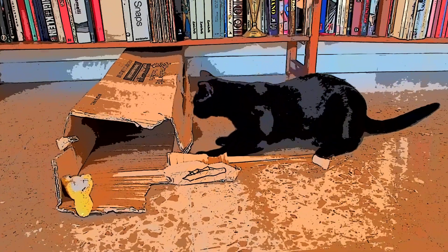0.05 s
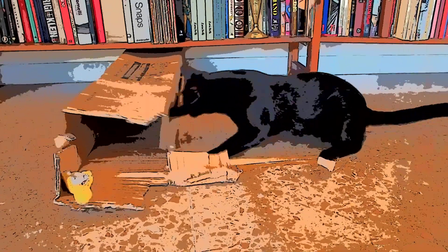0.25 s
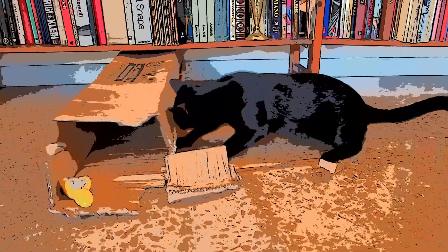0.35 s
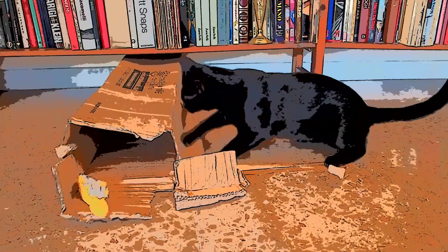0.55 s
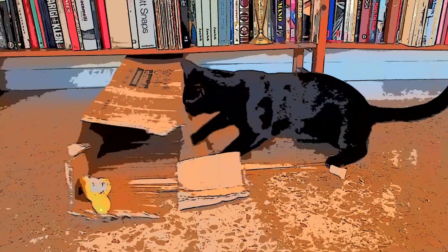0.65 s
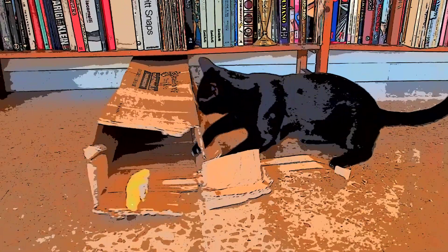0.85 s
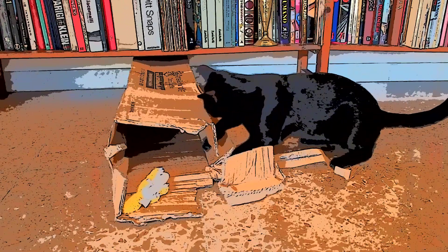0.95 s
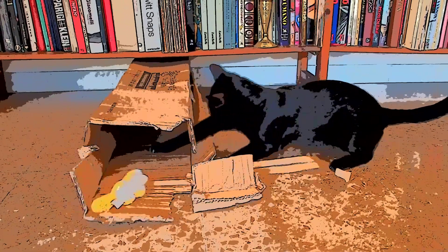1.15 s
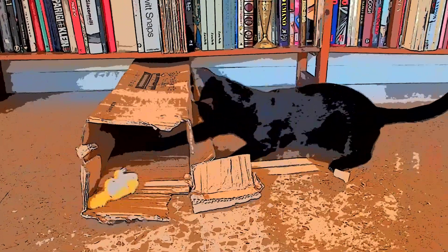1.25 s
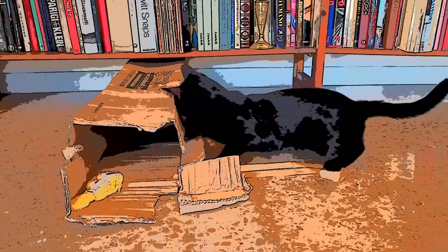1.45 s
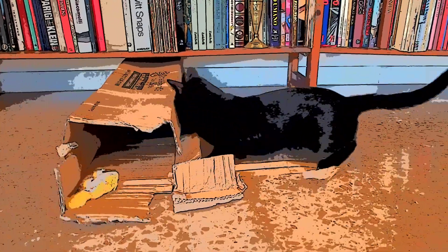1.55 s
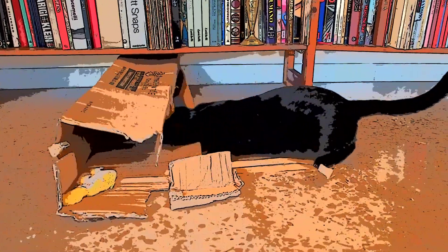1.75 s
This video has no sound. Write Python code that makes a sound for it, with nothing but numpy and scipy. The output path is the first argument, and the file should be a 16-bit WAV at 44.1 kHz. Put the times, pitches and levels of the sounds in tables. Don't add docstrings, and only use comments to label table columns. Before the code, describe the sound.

Cardboard box pushed by a cat: sharp snapping burst, hollow thumps, scraping, then a flap slap

```python
import sys
import numpy as np
from scipy import signal
from scipy.fft import rfft, irfft, next_fast_len
from scipy.io import wavfile
from scipy.ndimage import uniform_filter1d, map_coordinates

SR = 44100
rng = np.random.default_rng(int(sys.argv[2]) if len(sys.argv) > 2 else 0)


def ratio(d):
    e = np.asarray(d, float) / 20
    return 10 ** e


def store_wav(level_fs):
    pcm = np.round(np.clip(np.atleast_2d(level_fs), -1, 1) * 32767)
    wavfile.write(sys.argv[1], SR, pcm.T.astype(np.int16))


N = 79380


def unit(x):
    return x / np.sqrt(np.mean(x ** 2) + 1e-20)


def along(points, hz):
    f, v = np.transpose(points)
    return np.interp(np.log(hz + 1), np.log(f + 1), v)


def curves(rows):
    s, *cols = np.transpose(rows)
    t = np.arange(N) / SR
    return [np.interp(t, s, c, left=-120 * (k == 0)) for k, c in enumerate(cols)]


def wobble(rate_hz):
    knots = rng.standard_normal(int(N * rate_hz / SR) + 4)
    return map_coordinates(knots, [np.arange(N) * rate_hz / SR])


def filtered(x, response):
    m = next_fast_len(N + SR // 2)
    return irfft(rfft(x, m) * response(np.fft.rfftfreq(m, 1 / SR)), m)[..., :N]


def peak(f, hz, width_hz):
    return 1j * f * width_hz / (hz * hz - f * f + 1j * f * width_hz)


def resonances(table):
    return lambda f: sum((-1) ** k * ratio(db) * peak(f, hz, w) for k, (hz, w, db) in enumerate(table))


# f/Hz, correlation/0-1
LIKENESS = [(60, 1), (180, 0.83), (550, 0.55), (1650, 0.62), (4970, 0.27), (15000, 0.12)]


def spread(pair, spectrum):
    def response(hz):
        turn = np.arccos(np.clip(along(LIKENESS, hz), -1, 1)) / 2
        return ratio(along(spectrum, hz)) * [np.cos(turn), np.sin(turn)]

    mid, side = filtered(pair, response)
    return unit(np.array([mid + side, mid - side]))


def patchy(patchy_db):
    z = signal.stft(rng.standard_normal((2, N)), nperseg=256)[2]
    field = uniform_filter1d(rng.standard_normal(z.shape[1:]), 8, 0)
    field = uniform_filter1d(field, 9, 1)
    return signal.istft(z * ratio(patchy_db * unit(field)), nperseg=256)[1][:, :N]


def add(out, s, x):
    out[round(s * SR):][:len(x)] += x


# f/Hz, level/dB per Hz
AIR_SPECTRUM = [(28, -7.5), (90, 3.5), (352, -13.5), (392, -11), (447, -10), (855, -15.5), (1670, -23),
                (3270, -25), (15900, -34)]


def air():
    air_db, hum_hz, hum_db = -45.5, 49, -36
    duck_db, duck_at_s = -8, 0.24
    t = np.arange(N) / SR
    gain_db = duck_db / (1 + np.exp((duck_at_s - t) / 0.019)) - 12 * np.exp(-t / 0.075)
    phase = 2 * np.pi * np.cumsum(hum_hz + 8.0 * wobble(9.2)) / SR
    hum = np.sin(phase) * ratio(gain_db + 1.3 * wobble(10.8))
    return ratio(air_db) * spread(patchy(patchy_db=-0.1), AIR_SPECTRUM) + ratio(hum_db) * hum


# t/s, rubbing level/dB, brightness/dB
SLIDE_CURVE = [(0.19, -35.5, 1.5), (0.26, -30.5, 3), (0.31, -33.5, 11.5), (0.42, -37, 2), (0.495, -36, 1.5),
               (0.535, -37.5, 1), (0.66, -42.5, -1), (0.72, -35.5, 2.3), (0.86, -37.5, -0.1),
               (0.99, -37.5, -0.8), (1.04, -42, -2), (1.11, -35, 0.5), (1.26, -42.5, 0.1), (1.33, -36.5, 0),
               (1.42, -44, 1), (1.6, -45.5, 2.8), (1.68, -43, 0), (1.8, -41.5, 0)]
# f/Hz, level/dB per Hz
RUB_SPECTRUM = [(400, -56), (800, -4.5), (1400, -5), (2500, -7.5), (5500, -3.5), (9300, -9.5),
                (13000, -13.5), (15900, -19.5)]


def scrape():
    grains_per_s, grain_spread_db, grain_top, grain_db = 1400, 3, 1.4, -1.5
    level_db, tilt_db = curves(SLIDE_CURVE)
    size_db = grain_spread_db * np.minimum(rng.exponential(size=N), grain_top)
    slips = (rng.random(N) < grains_per_s / SR) * ratio(size_db)
    grains = np.sqrt(np.abs(uniform_filter1d(slips ** 2, size=24))) * rng.standard_normal((2, N))
    rub = spread(patchy(patchy_db=3.5) + ratio(grain_db) * unit(grains), RUB_SPECTRUM)
    high = filtered(rub, lambda f: 1 / (1 + (6500 / (f + 1)) ** 4))
    tilted = ratio(-tilt_db) * (rub - high) + ratio(tilt_db) * high
    return ratio(level_db + 1.2 * wobble(34.67)) * tilted


def panel_edge(f):
    return (1j * f / (45 + 1j * f)) ** 4 / (1 + 1j * f / 1100) ** 2


# t/s, panel load level/dB, small-panel share/dB
PUSH_CURVE = [(0.19, -46, -10), (0.212, -30, 3), (0.24, -33.5, 3.5), (0.35, -40.5, -2), (0.40, -24, 0.5),
              (0.448, -37, 7.5), (0.47, -28, 6.5), (0.52, -32.5, 1), (0.58, -36, 2.5), (0.72, -41.5, -3.5),
              (0.87, -45, 1.5), (0.91, -34, -5), (1.05, -41, -7.5), (1.16, -34, 0), (1.29, -38.5, -4.5),
              (1.47, -38, -7.5), (1.52, -31.5, -7.5), (1.8, -52.5, -1)]
# f/Hz, width/Hz, level/dB
PANEL_MODES = [(76, 30, -3), (125, 17.2, 1.5), (164.5, 30.7, 1.5), (205.5, 36.7, 0), (261, 35, -2.5),
               (400, 78, -4), (549.5, 62.5, -2.5), (673, 59, -4.5), (1040, 130, -10)]


def creak():
    def strained(modes):
        lumps = ratio(2.56 * wobble(59.58)) * rng.standard_normal(N)
        return filtered(lumps, lambda f: resonances(modes)(f) * panel_edge(f))

    load_db, small_db = curves(PUSH_CURVE)
    big, small = strained(PANEL_MODES[:5]), strained(PANEL_MODES[5:])
    return ratio(load_db) * (big + ratio(small_db) * small) / np.std(big + small)


# t/s, peak level/dB, f/Hz, rustle after it/dB
SNAP_EVENTS = [(0.1934, -12.5, 5300, -23), (.2442, -10, 4900, -36), (.2771, -3, 4350, -17),
               (0.2773, -3.5, 5800, -33), (0.2886, 0, 5470, -35), (0.2887, -13.5, 3050, -20),
               (0.3026, 2, 5190, -28.5), (.3044, -21, 5300, -24), (0.3166, -13, 5150, -23),
               (0.3266, -15, 9250, -6), (.3654, -20.5, 4500, -20), (0.3731, -22.5, 3840, -2),
               (0.4455, -16.5, 5300, -7.5), (0.4554, -17.5, 3000, -16), (0.6082, -25, 9100, -36),
               (0.6422, -28.5, 3900, -28), (.6655, -31, 4050, -8), (.6657, -21.5, 11400, -12),
               (.354, -28, 10500, -16), (0.883, -24, 2650, -19), (0.912, -27, 9600, -7),
               (0.9864, -17, 9600, -17), (1.065, -29, 5340, -5), (1.1435, -19, 2400, -6),
               (.2772, -10, 8600, -30), (1.1445, -22, 8150, -13), (1.32, -29, 3200, -2),
               (1.508, -19.5, 3270, -8), (1.704, -25.5, 11170, -12.5)]


def snaps():
    rise_cycles, decay_cycles = 0.8, 7.96
    overtone, overtone_db = 1.8, -9.5
    crack_db, crack_grows, crack_width, crack_top_hz = -8.5, 0.46, 1, 10500
    rustle_t60_s, rustle_rise_s, rustle_width = 0.15, 0.0092, 2.7
    pops, rustle, t = np.zeros(N + SR), np.zeros((N + SR, 2)), np.arange(SR // 5) / SR
    f = np.fft.rfftfreq(len(t), 1 / SR)

    def band(count, width, hz):
        noise = rfft(rng.standard_normal((count, len(t))))
        top = 1 + (f / max(crack_top_hz, 2.3 * hz)) ** 4
        return unit(irfft(noise * peak(f, 1.033 * hz, width * hz) ** 2 / top, len(t)))

    for s, db, hz, tail_db in SNAP_EVENTS:
        cycles = t * hz
        crack = band(1, crack_width, hz)[0]
        hiss = band(2, rustle_width, hz)
        ring = np.sin(2 * np.pi * cycles) + ratio(overtone_db) * np.sin(2 * np.pi * overtone * cycles)
        ring += ratio(crack_db - crack_grows * db) * crack
        decay = ratio(db - 3.5 - 20 * (cycles / decay_cycles) ** 2)
        add(pops, s, unit(ring) * decay * np.clip(cycles / rise_cycles, 0, 1))
        swell = ratio(db + tail_db - 60 * t / rustle_t60_s) * (1 - np.exp(-t / rustle_rise_s))
        add(rustle, s, (swell * hiss).T)
    wide = spread(rustle[:N].T, [(100, 0)]) * np.std(rustle[:N])
    return pops[:N], ratio(0.63 * wobble(70.4)) * wide


# t/s, peak level/dB, f/Hz
THUD_EVENTS = [(.208, -20, 206.6), (.228, -25.5, 461), (0.274, -23, 125), (0.3958, -12, 184.5),
               (.3975, -15, 510), (.413, -19.5, 409), (0.4543, -13, 384), (.4555, -18, 700),
               (0.458, -25, 107), (.468, -15.5, 70.5), (0.473, -23.5, 396), (.481, -16, 205),
               (.499, -25, 590), (0.515, -19, 110), (.513, -24, 400), (.536, -19.5, 201), (.551, -19, 184),
               (.575, -24.5, 388), (0.59, -21, 130), (.598, -23, 1041), (0.667, -23.5, 121),
               (.735, -28, 108.6), (1.139, -28, 607), (1.141, -21.5, 262), (1.166, -26, 118),
               (1.31, -24, 163.4), (1.347, -20, 125), (1.455, -35, 125), (1.492, -24, 376),
               (1.572, -24.5, 202)]


def thuds():
    rise_s, t60_s, gain_db = 0.0021, 0.11, -2.5
    out, t = np.zeros(N + SR), np.arange(SR // 4) / SR
    for s, db, hz in THUD_EVENTS:
        shape = ratio(db + gain_db - 60 * t / t60_s) * (1 - np.exp(-t / rise_s))
        phase = 2 * np.pi * hz * t
        add(out, s, shape * (np.sin(phase) + 0.18 * np.sin(2.4 * phase) + 0.2 * np.sin(1.7 * phase)))
    return filtered(out[:N], panel_edge)


# centre t/s, half length/s, level/dB, colour f/Hz
STROKE_EVENTS = [(0.223, 0.014, -34, 4430), (0.465, 0.0072, -33, 4680), (0.491, 0.0067, -28.5, 5600),
                 (0.559, 0.0059, -34, 5100), (0.71, 0.025, -36, 4100), (0.888, 0.003, -30, 4760),
                 (0.935, 0.0075, -36.5, 3320), (0.996, 0.012, -34.5, 5700), (1.074, 0.0093, -34.5, 5200),
                 (1.115, 0.019, -35, 4800), (1.199, 0.004, -25.5, 2600), (1.225, 0.025, -42, 1600),
                 (1.32, 0.0095, -51, 3500), (1.453, 0.015, -41, 3720), (1.506, 0.012, -36.5, 3500),
                 (1.677, 0.029, -41.5, 3320)]


def strokes():
    width = 0.89
    t, out = np.arange(N) / SR, np.zeros((2, N))
    for s, half_s, db, hz in STROKE_EVENTS:
        grit = ratio(3.0 * wobble(500)) * rng.standard_normal((2, N))
        coloured = unit(filtered(grit, lambda f: peak(f, hz, width * hz) ** 2))
        out += ratio(db) * np.exp(-((t - s) / half_s) ** 2 / 2) * coloured
    return spread(out, [(100, 0)]) * np.std(out)


# t/s, peak level/dB, colour f/Hz
TICK_EVENTS = [(0.32, -21, 2500), (.392, -26, 3500), (0.448, -21, 6570), (.484, -18, 5800),
               (.4715, -20, 5500), (0.5966, -24, 1300), (0.596, -23, 4500), (1.1418, -12.5, 5500),
               (1.1439, -13.5, 5800), (1.157, -22, 2200), (1.192, -28, 1900), (1.1998, -24, 1600),
               (1.2016, -23, 3200), (1.214, -28, 1600), (1.3197, -24, 2570), (1.321, -21, 4140),
               (1.326, -21, 2600), (1.332, -19, 2680), (1.338, -24.5, 2880), (1.378, -26, 2120),
               (1.515, -20, 3500), (1.524, -28, 3500)]


def ticks():
    t60_s, width = 0.013, 1.46
    out, t = np.zeros(N + SR), np.arange(SR // 40) / SR
    f = np.fft.rfftfreq(len(t), 1 / SR)
    for s, db, hz in TICK_EVENTS:
        noise = rfft(rng.standard_normal(len(t)))
        burst = unit(irfft(noise * peak(f, hz, width * hz) ** 2, len(t)))
        add(out, s, ratio(db - 5.5 - 60 * t / t60_s) * burst)
    return out[:N]


FLAP_TIMES = [1.143, 1.156, 1.188, .6]
# level/dB, rattle t60/s
FLAP_SLAPS = [(-21.5, 0.072), (-33.5, 0.56), (-41, 0.12), (-40, 0.39)]
# f/Hz, width/Hz, level/dB
FLAP_MODES = [(1055, 43, 3), (1407, 51, 2.5), (1750, 210, -3.5), (2000, 210, -24), (2560, 170, -10.5),
              (3500, 310, -21)]


def flap():
    shake, t = np.zeros(N + SR), np.arange(SR // 2) / SR
    for s, (db, t60_s) in zip(FLAP_TIMES, FLAP_SLAPS):
        add(shake, s, ratio(db - 60 * t / t60_s))
    drive = ratio(2.8 * wobble(150)) * rng.standard_normal(N)
    body = resonances(FLAP_MODES)
    return filtered(shake[:N] * drive, body) / np.std(filtered(drive, body))


# f/Hz, level/dB, t60/s
KNOCK_MODES = [(640, -24, .03), (950, -25, .025), (1440, -17, .045), (1780, -15, .03), (2520, -15, .03),
               (3250, -21, .025)]


def knock():
    at_s, rise_s = 1.1418, 0.0006
    out, t = np.zeros(N + SR), np.arange(SR // 10) / SR
    ring = sum(ratio(db - 60 * t / t60_s) * np.sin(2 * np.pi * hz * t) for hz, db, t60_s in KNOCK_MODES)
    add(out, at_s, -ring * (1 - np.exp(-t / rise_s)))
    return out[:N]


# f/Hz, t60/s
ROOM_DECAY = [(200, 0.49), (2000, 0.88), (10000, 0.048)]


def room(x):
    noise = spread(rng.standard_normal((2, N)), [(100, 0)])[:, :SR // 2]
    hz, t, z = signal.stft(noise, SR, nperseg=256)
    tail = signal.istft(z * ratio(-60 * t / along(ROOM_DECAY, hz)[:, None]), SR, nperseg=256)[1]
    delayed = np.pad(x, (150, 0))[None]
    return signal.fftconvolve(delayed, tail / np.linalg.norm(tail[0]), axes=1)[:, :N]


def scene():
    room_db, lag_s = -17, 1.6e-5
    background, rubbing = air(), scrape()
    pops, rustle = snaps()
    low = creak() + thuds()
    sharp = pops + ticks() + flap() + knock()
    sides = np.array([[-1], [1]])
    aside = filtered(sharp, lambda f: np.exp(np.pi * 1j * f * lag_s * sides))
    near = low * ratio(-0.4 * sides) + aside * ratio(0.3 * sides)
    return near + rustle + rubbing + strokes() + ratio(room_db) * room(low + sharp) + background


# f/Hz, width/Hz, depth/0-1
CASING_DIPS = [(1632, 140, 0.75), (6610, 1220, 0.76), (10430, 970, 1)]


def casing(f):
    return np.prod([1 - np.clip(d, 0, .95) * peak(f, hz, w) for hz, w, d in CASING_DIPS], axis=0)


def roll_off(x):
    return signal.sosfilt(signal.butter(12, 16050, fs=SR, output="sos"), x)


def record(dry):
    top_hz, offset = 16000, -0.0026
    dips = filtered(dry, casing)
    held = dips / (1 + np.abs(dips) ** 16) ** (1 / 16)
    limited = filtered(held, lambda f: (f < top_hz) / (1 + (f / 16500) ** 12))
    return roll_off(limited + offset)


dry = scene()
out = record(dry)
store_wav(out)
```